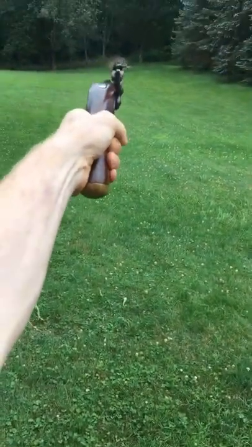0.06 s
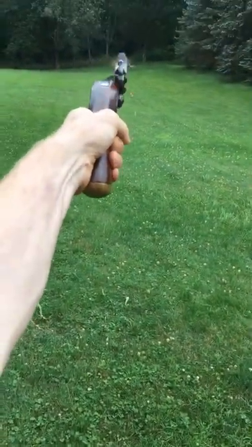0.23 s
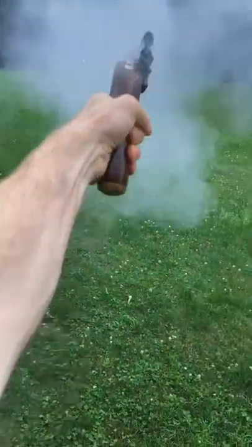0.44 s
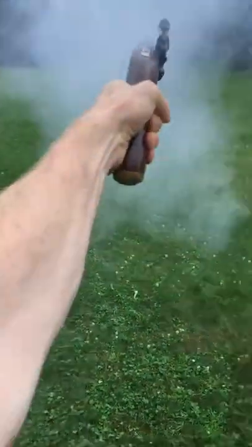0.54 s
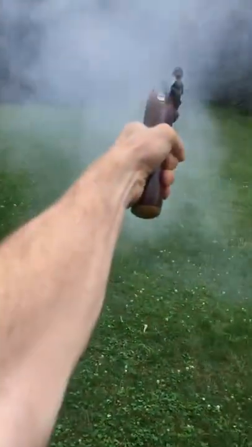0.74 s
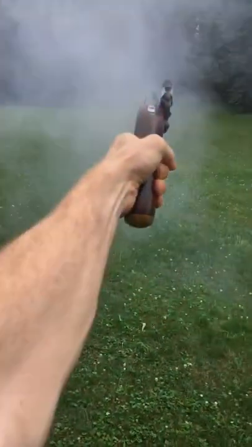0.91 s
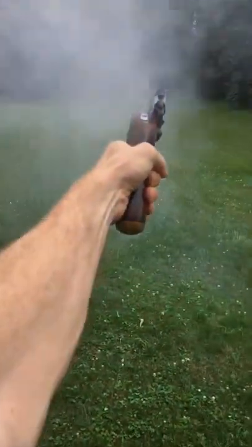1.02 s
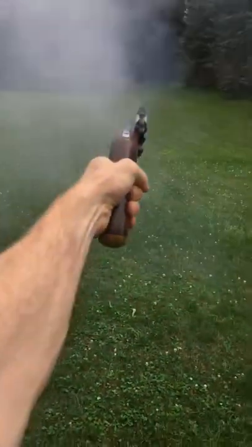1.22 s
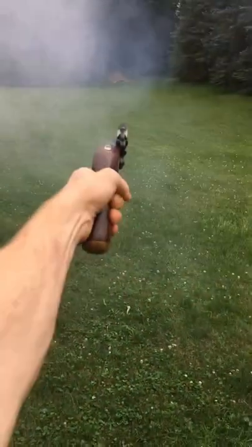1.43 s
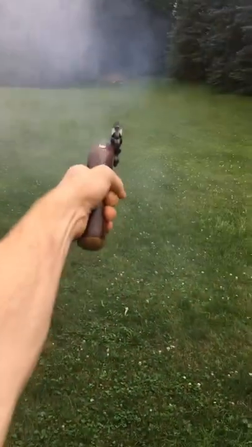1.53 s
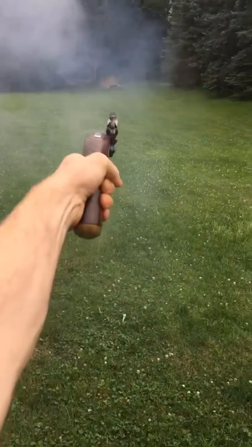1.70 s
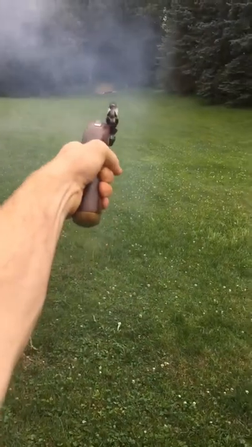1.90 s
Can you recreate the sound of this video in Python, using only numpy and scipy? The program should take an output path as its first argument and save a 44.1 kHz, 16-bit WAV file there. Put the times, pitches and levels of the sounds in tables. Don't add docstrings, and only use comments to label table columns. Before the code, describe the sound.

A flintlock pistol clacks, flashes and fires one cracking shot, echoing off trees around a lawn

```python
import sys
import numpy as np
from scipy import signal
from scipy.fft import rfft, irfft
from scipy.io import wavfile
from scipy.ndimage import uniform_filter1d

SR = 44100
rng = np.random.default_rng(int(sys.argv[2]) if len(sys.argv) > 2 else 0)


def pcm_store(signal):
    levels = np.round(np.clip(np.atleast_2d(signal), -1, 1) * 32767)
    wavfile.write(sys.argv[1], SR, levels.astype(np.int16).T)


def natural_amplitude(level_db):
    exponent = np.asarray(level_db, float) / 20
    return 10 ** exponent


N = 85995
BANG_S = 0.3


def unit(x):
    return x / np.sqrt(np.mean(x ** 2))


def band(x, hz, width_hz):
    centre_hz = min(hz, 0.45 * SR)
    q = max(hz / min(width_hz, SR / 3), 0.3)
    return signal.lfilter(*signal.iirpeak(centre_hz, q, fs=SR), x)


def band_noise(hz, width_hz):
    return band(band(rng.standard_normal(N), hz, width_hz), hz, width_hz)


def shape(table, hz):
    table = np.array(table)
    return np.interp(np.log(hz), np.log(table[:, 0]), table[:, 1])


def coloured(table, tilt_db_per_oct=0.):
    hz = np.maximum(np.arange(N // 2 + 1) * SR / N, 5)
    gain_db = shape(table, hz) + tilt_db_per_oct * np.log2(hz / 2000)
    return unit(irfft(rfft(rng.standard_normal(N)) * natural_amplitude(gain_db), N))


def walk(rate_per_s):
    hold = max(int(SR / rate_per_s), 2)
    levels = rng.standard_normal(N // 2 + 1)[:N // hold + 1]
    return unit(uniform_filter1d(np.repeat(levels, hold), hold)[:N])


def envelope(t, rise_s, hold_s, t60_s):
    fall_s = np.clip(t - rise_s - hold_s, 0, None)
    return np.clip(t / rise_s, 0, 1) ** 2 * natural_amplitude(-60 * fall_s / t60_s)


def curve(t, table, left=None):
    return np.interp(t, *np.array(table).T, left=left)


def cracks(t, rows, width, clang=0.):
    out, noise = np.zeros(N), rng.standard_normal(N)
    for at_s, db, hz, length_s in rows:
        burst = noise * envelope(t - at_s, 0.00017, length_s, 3 * length_s)
        burst = band(band(burst, hz, width * hz), hz, 2 * width * hz)
        ring_s = min(length_s, 4 / hz)
        ring = envelope(t - at_s, ring_s / 2, ring_s / 2, 2 * ring_s) * np.sin(2 * np.pi * hz * (t - at_s))
        out += natural_amplitude(db) * ((1 - clang) * burst / np.abs(burst).max() + clang * ring)
    return out


# frequency in Hz, level in dB per Hz.
WIND = [(12, -34), (20, -0.5), (65, -2.5), (97, -3.5), (147, -8), (206, -35.5), (264, -18), (304, -35.5),
        (400, -34), (520, -64.5), (880, -120)]
# frequency in Hz, level in dB per Hz.
CALM = [(15, -19.5), (40, -4), (105, -2), (130, -24), (200, -39.5), (600, -71)]
# time in seconds, level in dB.
GUST = [(.5, -58), (.55, -67), (.65, -50.5), (.8, -56), (.95, -61), (1.05, -64), (1.2, -51.5),
        (1.35, -53.5), (1.5, -52), (1.7, -47.5), (1.95, -53)]


def wind(t):
    hum = unit(band_noise(92, 23))
    calm = natural_amplitude(-51.5) * (coloured(CALM) + natural_amplitude(3.5) * hum)
    gusts = natural_amplitude(curve(t, GUST) + 0.98 * walk(24)) * (coloured(WIND) + natural_amplitude(-5.5) * hum)
    return np.where(t < BANG_S, calm, gusts)


# frequency in Hz, level in dB per Hz.
OPEN_AIR = [(120, -28), (220, -0.5), (500, 1), (1200, -2.5), (2700, -8.5), (5600, -5), (9000, -10.5),
            (16000, -17)]


def open_air(t):
    duck_db, recover_s = -17.5, 1.59
    remaining = np.clip(1 - ((t - BANG_S) / recover_s) ** 4, 0, 1)
    return natural_amplitude(-63 + duck_db * (t > BANG_S) * remaining) * coloured(OPEN_AIR)


# pitch in Hz, width in Hz, level in dB.
INSECTS = [(7480, 200, -74), (8600, 200, -76)]


def insects(t):
    out = np.zeros(N)
    for hz, width_hz, db in INSECTS:
        out += (t < BANG_S) * natural_amplitude(db + 1.7 * walk(30)) * unit(band_noise(hz, width_hz))
    return out


# frequency in Hz, level in dB per Hz.
LEAVES = [(1180, -30), (2000, -4), (3520, -7.5), (4150, 6.5), (4730, -12), (6250, -5), (7440, -14.5),
          (14300, -28.5), (16000, -33)]
# time in seconds, level in dB.
RUSTLE = [
    (1.3, -87),
    (1.38, -68.5),
    (1.54, -74.5),
    (1.55, -63.5),
    (1.7, -64.5),
    (1.8, -64.5),
    (1.95, -72),
]


def leaves(t):
    return natural_amplitude(curve(t, RUSTLE) + 1.1 * walk(28)) * coloured(LEAVES)


# start in seconds, level in dB, rise in seconds, fall t60 in seconds.
ECHOES = [
    (0.561, -38, 0.014, 1),
    (0.618, -31, 0.021, 0.33),
    (0.635, -34.5, 0.024, 0.087),
    (.69, -36, 0.016, 0.69),
    (0.734, -36.5, 0.022, 0.83),
    (0.799, -39, 0.023, 0.64),
    (.86, -43.5, 0.016, 0.17),
]
# time in seconds, level in dB.
FAR = [(.85, -54.5), (.95, -49), (1.1, -50.5), (1.33, -55), (1.42, -52), (1.55, -49.5), (1.75, -46.5),
       (1.95, -50.5)]
# frequency in Hz, level in dB per Hz.
WOODS = [(59, -32), (100, 0.5), (143, -1), (177, -19), (547, -1.5), (2860, -12.5), (6700, -23),
         (12700, -32.5), (16000, -80.5)]


def tree_lines(t):
    near = np.sqrt(sum((natural_amplitude(db) * envelope(t - at_s, rise_s, 0, t60_s)) ** 2
                       for at_s, db, rise_s, t60_s in ECHOES))
    swell = np.hypot(near, natural_amplitude(curve(t, FAR, left=-200) + 2 * walk(45)))
    scatter_per_s = 54
    out, steady, shared = 0, 0, walk(scatter_per_s)
    for hz in 110 * 2 ** np.arange(0, 7.3, 0.5):
        part = natural_amplitude(shape(WOODS, hz)) * band_noise(hz, hz / 2)
        air_db = -67.5 * (hz / 10000) ** 1.67 * np.clip(t - 0.6, -0.3, 0.6)
        scatter_db = 0.53 * shared + 0.94 * walk(2.6 * scatter_per_s)
        steady = steady + part
        out = out + part * natural_amplitude(air_db + scatter_db)
    return swell * out / np.std(steady)


def canopy(t):
    bright = band(band(rng.standard_normal(N), 6170, 2900), 6170, 3100)
    return natural_amplitude(-45) * envelope(t - 0.534, 0.11, 0, 0.41) * unit(bright)


# start in seconds, level in dB, pitch in Hz, length in seconds.
SLAPS = [(0.561, -30, 910, 0.0053), (0.577, -31.5, 993, 0.012), (0.568, -47, 12500, 0.0018),
         (0.621, -40, 900, 0.0045), (0.628, -34, 810, .004), (0.6454, -32, 3540, 0.0053),
         (0.634, -28, 1223, 0.0099), (0.587, -31.5, 990, 0.0086), (.671, -35, 253, 0.005),
         (0.723, -36, 2200, .004), (0.733, -30, 1410, 0.0048), (0.701, -28, 810, 0.0066),
         (0.747, -38.5, 130, 0.035), (0.761, -38, 706, 0.009), (0.823, -35.5, 890, 0.023),
         (.865, -33, 1087, 0.019), (0.868, -44, 112, 0.019), (1.045, -42.5, 134.6, 0.033),
         (1.135, -45, 150.7, 0.038), (1.204, -38.5, 90.7, 0.012), (1.313, -40, 60.8, 0.022)]


def slaps(t):
    return cracks(t, SLAPS, width=0.34, clang=0.25)


# start in seconds, level in dB, pitch in Hz, length in seconds.
TRIGGER = [
    (.1873, -33, 2700, .0025),
    (.1876, -46, 11500, .002),
    (.1875, -41, 6000, .002),
    (.1945, -44, 6900, .004),
    (.1942, -47, 12800, .003),
    (.1940, -47, 2800, .005),
    (.203, -55, 12500, .008),
    (.206, -52, 2500, .008),
    (.220, -53, 1900, .004),
    (.2347, -45, 1000, .0015),
]


def trigger(t):
    return cracks(t, TRIGGER, width=0.7)


# start in seconds, level in dB, pitch in Hz, length in seconds.
STRIKES = [(.2416, -6.5, 2700, 0.0019), (.2420, -8.5, 6200, .0014), (.2418, -9, 4200, 0.0012),
           (.2467, 1.5, 4200, 0.00055), (.2468, -7, 8500, .0005), (.2468, -3, 6300, 0.00054),
           (.2490, -15.5, 4250, .003), (.2476, -10, 2600, .001), (.2530, 0, 2850, .0011),
           (.2425, -14, 1700, .002), (.2560, -14, 1900, .003), (.2665, -17, 2000, .002),
           (.2640, -14, 6500, .001), (.2745, -19, 1450, .003), (.2553, -5.5, 6100, 0.0018),
           (.2598, -11, 2600, 0.0014), (.2608, -10, 6200, .0012), (.2705, -19, 2600, 0.0016)]
# frequency in Hz, level in dB, t60 in seconds.
LOCK = [(300, -21, 0.061), (1497, -11.5, 0.095), (2010, -16.5, 0.0089), (2265, -20, 0.01),
        (2697, -7.5, 0.01), (3000, -2.5, 0.018), (4280, -5.5, .02), (6114, -6, 0.037), (6800, -5.5, 0.042),
        (8750, -2.5, 0.019), (9650, 8, 0.011), (11320, -11.5, .02)]


def lock(t):
    hits, ring = cracks(t, STRIKES, width=0.62, clang=0.55), 0
    for hz, db, t60_s in LOCK:
        pole = np.exp(2j * np.pi * hz / SR - np.log(1000) / (t60_s * SR))
        ring = ring + natural_amplitude(db) * signal.lfilter([1], [1, -pole], hits).imag
    return hits + natural_amplitude(-27.5) * ring


# frequency in Hz, level in dB per Hz.
SCRAPE = [(410, -60), (700, -33), (1330, -9.5), (2080, -12.5), (2880, -6), (3550, -10.5), (5190, -13),
          (5920, -10), (16000, -18.5)]


def scrape(t):
    return natural_amplitude(-20.5 + 1.4 * walk(300)) * envelope(t - 0.2415, 0.0013, 0.021, 0.15) * coloured(SCRAPE)


# start in seconds, level in dB, pitch in Hz, length in seconds.
CONTACTS = [(0.244, -27, 300, 0.018), (0.298, -21.5, 390, 0.0047), (.314, -34, 2500, .005),
            (0.365, -16.5, 900, 0.024), (.3494, -3, 6300, .0012), (.3512, -5, 8000, .001),
            (.3518, -3, 3000, .001), (.3528, -3, 4100, .001), (.4130, -11, 2250, .0018),
            (.4135, -16, 1200, .002), (.4350, -20, 3570, .0015), (.4240, -24, 900, .003),
            (.4365, -28, 1800, .003), (.3675, -13, 4000, .001), (.3725, -12, 1000, .002),
            (.3775, -12.5, 1700, .003), (.3585, -12.5, 1600, .001), (.3500, -9, 380, 0.0034),
            (.3635, -12.5, 600, 0.0037), (.3805, -13, 500, 0.0028), (0.35, -19, 640, .005),
            (1.555, -57, 6000, .002), (1.5885, -45, 3500, .004), (1.588, -41, 3200, .004),
            (1.8, -37, 3100, .002), (1.2, -38, 1130, .002), (1.548, -61, 6500, 0.0053),
            (1.895, -46, 4100, 0.0081)]


def knocks(t):
    return cracks(t, CONTACTS, width=0.55, clang=0.35)


# start in seconds, level in dB, rise, hold and fall t60 in seconds, tilt in dB per octave.
JETS = [
    (0.277, -26.5, 0.0061, 0.014, 0.18, -3.5),
    (0.321, -34, 0.023, .005, 0.028, 2),
    (0.3448, -11, 0.0045, 0.0042, 0.0078, 2),
    (0.3546, -16, 0.0027, 0.025, 0.12, 0.83),
    (0.418, -35.5, 0.0048, 0.036, 0.38, -1.5),
]
# frequency in Hz, level in dB per Hz.
GAS = [(59, -29.5), (100, -2), (524, -14), (1010, -7.5), (1200, -12.5), (1390, -10.5), (4870, -14.5),
       (9610, -17.5), (16000, -29.5)]


def gas_jets(t):
    out = np.zeros(N)
    for at_s, db, rise_s, hold_s, t60_s, tilt in JETS:
        sputter = natural_amplitude(db + 1.5 * walk(400))
        out += sputter * envelope(t - at_s, rise_s, hold_s, t60_s) * coloured(GAS, tilt)
    return out


# start in
# seconds, level in dB, length in seconds.
HEAVES = [(0.258, -26.5, 0.021), (0.2859, -24.5, .006), (0.2907, -17, 0.0098), (0.304, -15.5, 0.028),
          (0.335, -20, 0.022), (.3520, -13.5, 0.0039), (0.3555, -8, 0.0044), (0.361, -11.5, 0.011),
          (0.376, -13, 0.0094), (0.383, -8, .027), (0.416, -20, 0.0098), (0.429, -27, 0.015),
          (0.443, -29.5, 0.021), (0.465, -38, 0.025), (0.514, -50, .025), (0.096, -44, 0.031),
          (0.163, -41.5, 0.021), (.6515, -31.5, 0.0078)]


def heaves(t):
    out = np.zeros(N)
    for at_s, db, length_s in HEAVES:
        out += natural_amplitude(db) * np.sin(2 * np.pi * np.clip((t - at_s) / length_s, 0, 1))
    return out


def buffet(t):
    return natural_amplitude(-25) * envelope(t - 0.356, 0.002, 0.037, 0.17) * unit(band_noise(186, 380))


def scene():
    t = np.arange(N) / SR
    background = np.clip(t / 0.0028, 0, 1) * (wind(t) + open_air(t) + insects(t) + leaves(t))
    woods = tree_lines(t) + canopy(t) + slaps(t)
    flintlock = trigger(t) + lock(t) + scrape(t) + knocks(t)
    charge = gas_jets(t) + heaves(t) + buffet(t)
    return (background + woods + flintlock + charge)[None]


def band_limit(x):
    return signal.sosfilt(signal.butter(12, 16640, fs=SR, output="sos"), x)


# frequency in Hz, width in Hz, depth as a share (below 0 lifts).
CASE_NOTCHES = [(4875, 570, 0.65), (10450, 390, 0.7), (4260, 410, -0.3), (6330, 1100, -0.4)]


def record(dry):
    for hz, width_hz, depth in CASE_NOTCHES:
        dry = dry - depth * band(dry, hz, width_hz)
    rounded = 1.124 * np.tanh(dry / 1.173)
    top_cut = signal.ellip(9, 0.3, 70, 15900, fs=SR, output="sos")
    mix = signal.sosfilt(top_cut, rounded)
    return band_limit(mix)


dry = scene()
out = record(dry)
pcm_store(out)
```